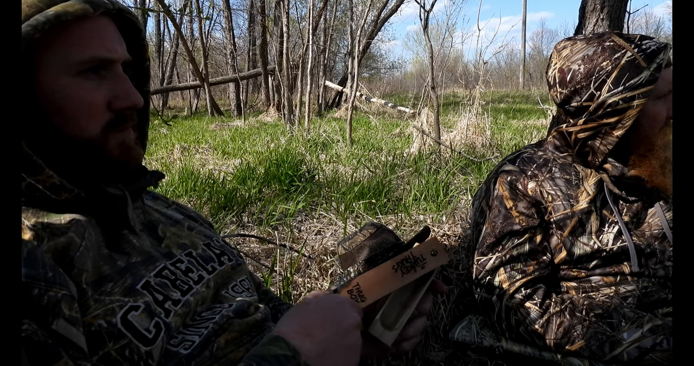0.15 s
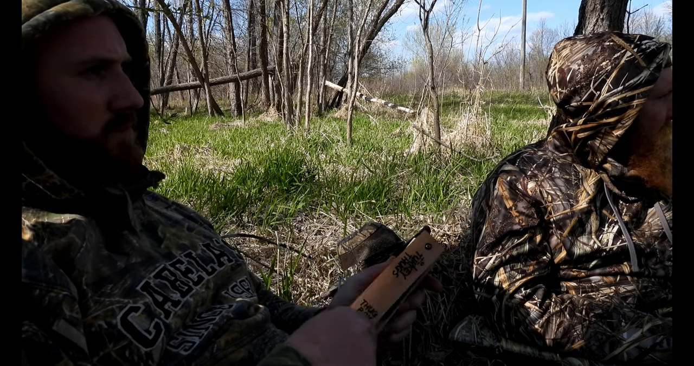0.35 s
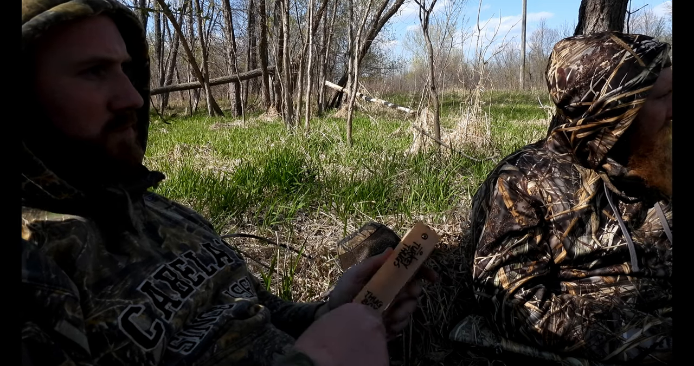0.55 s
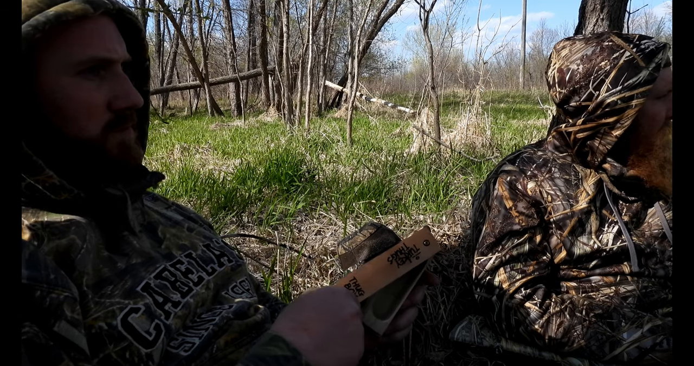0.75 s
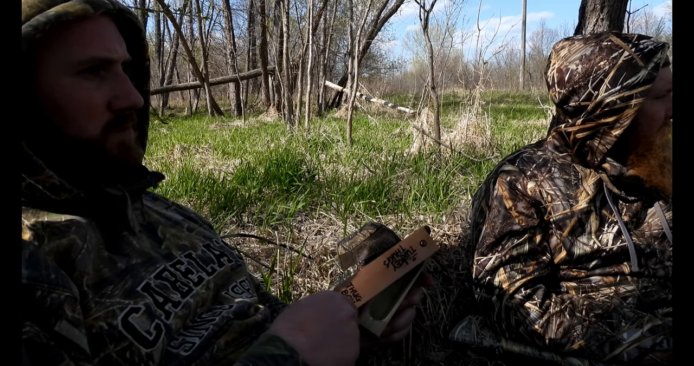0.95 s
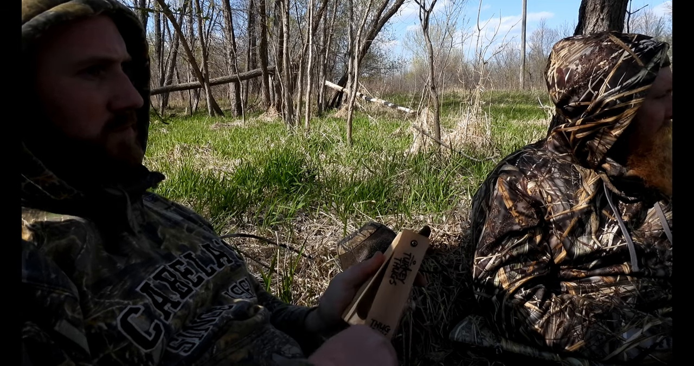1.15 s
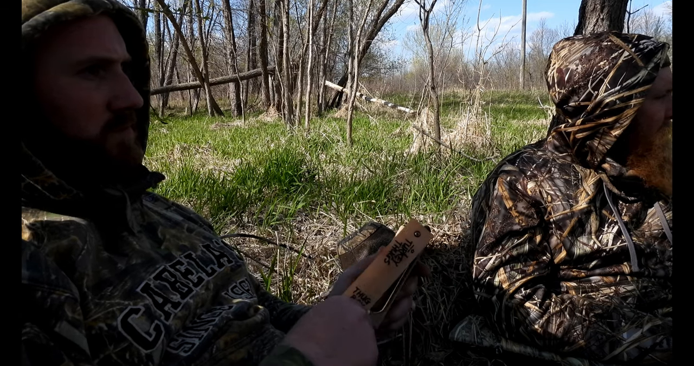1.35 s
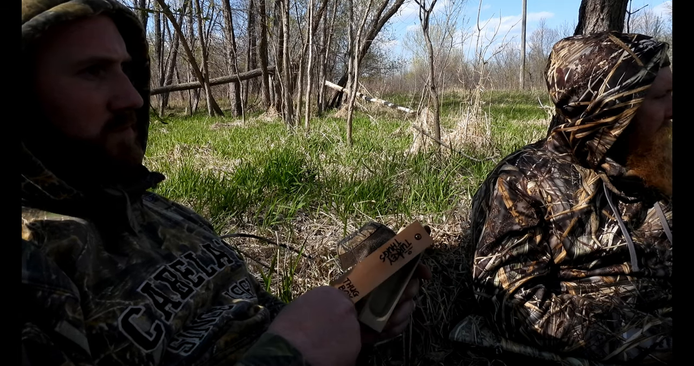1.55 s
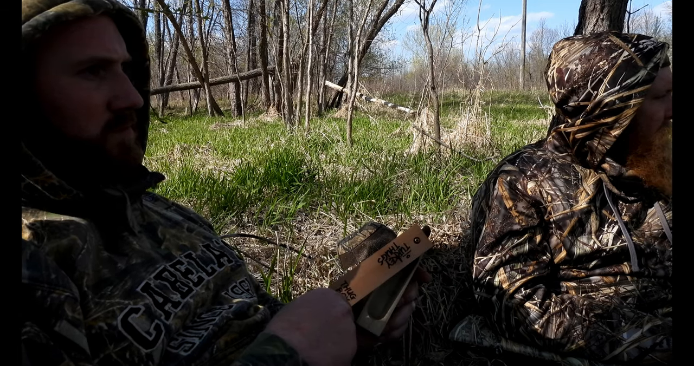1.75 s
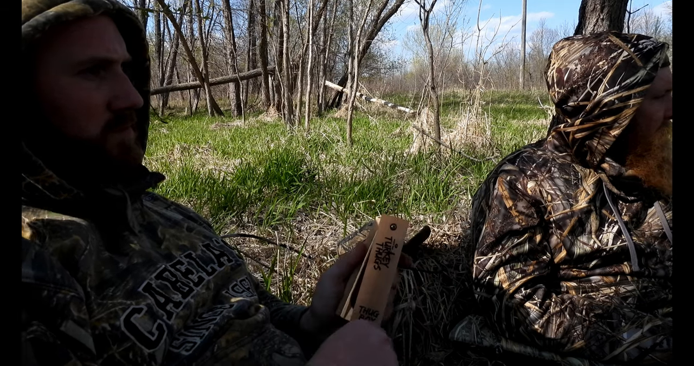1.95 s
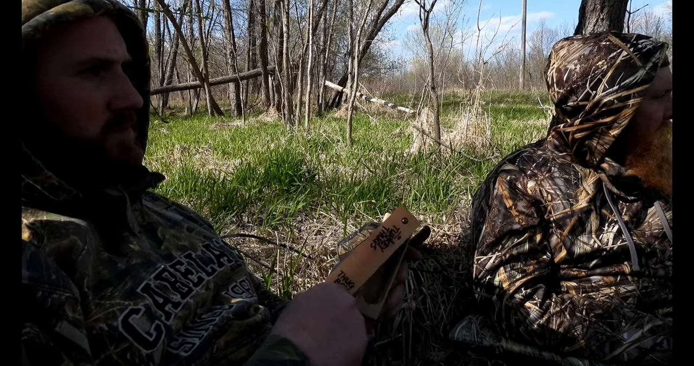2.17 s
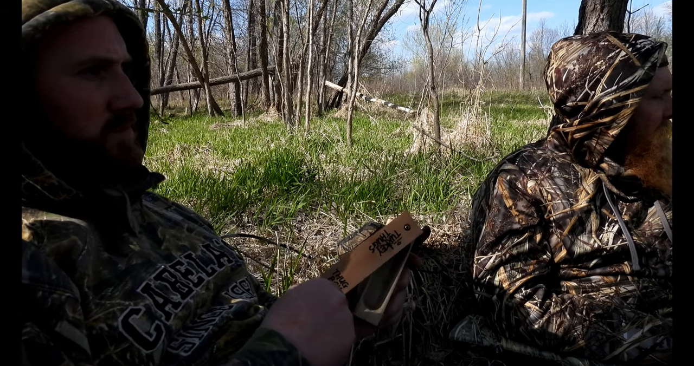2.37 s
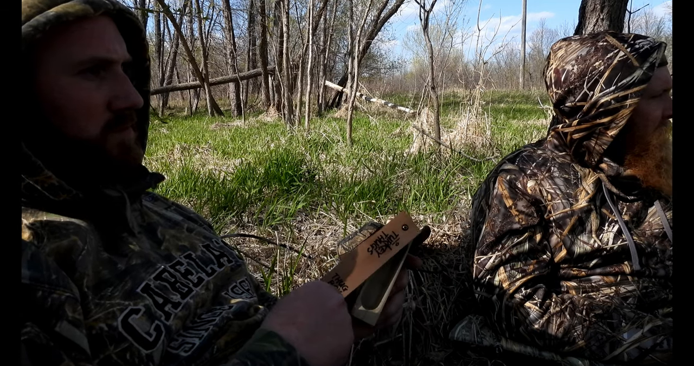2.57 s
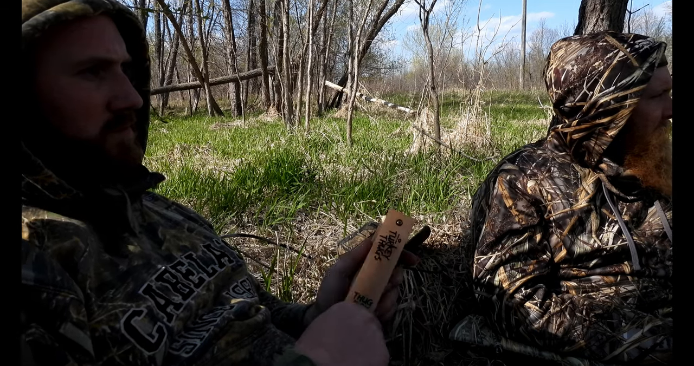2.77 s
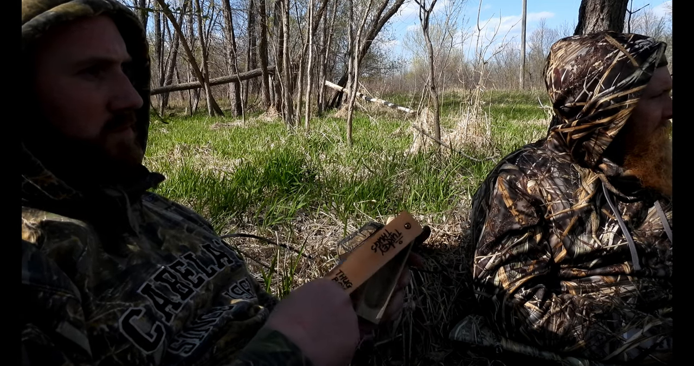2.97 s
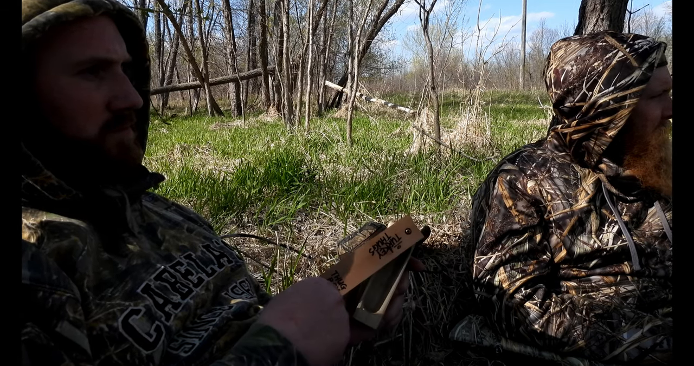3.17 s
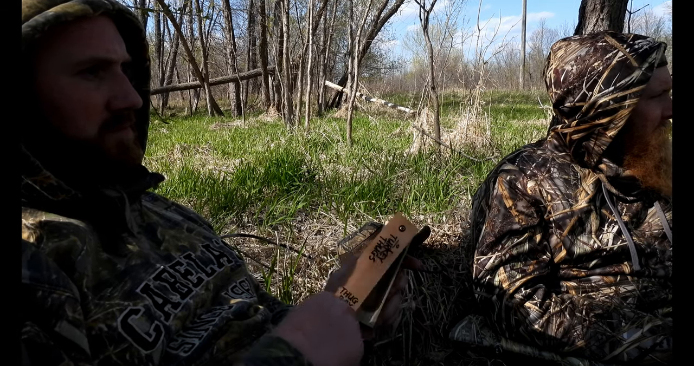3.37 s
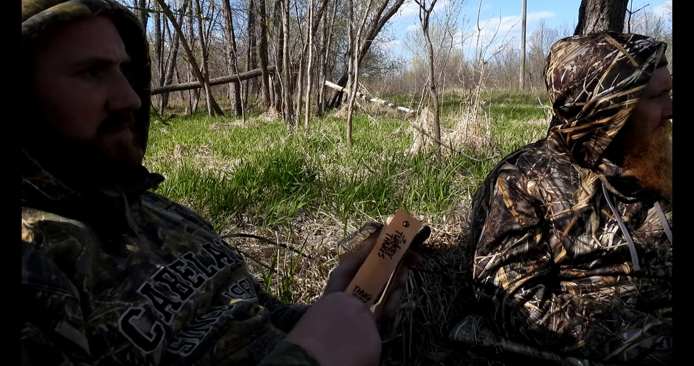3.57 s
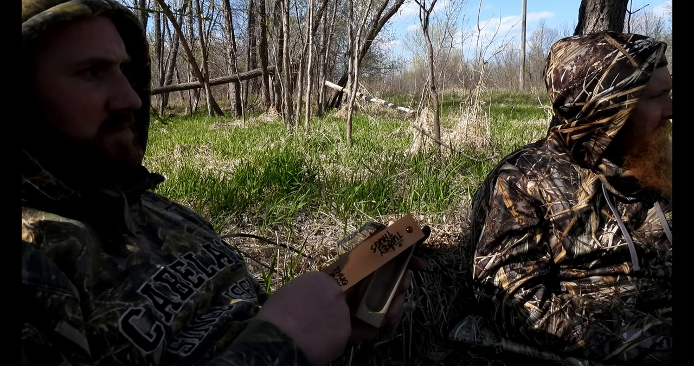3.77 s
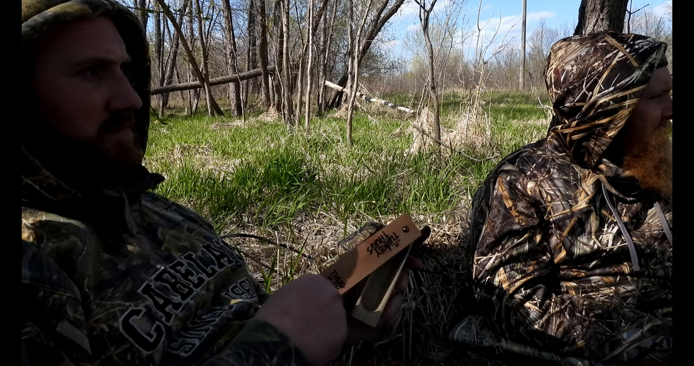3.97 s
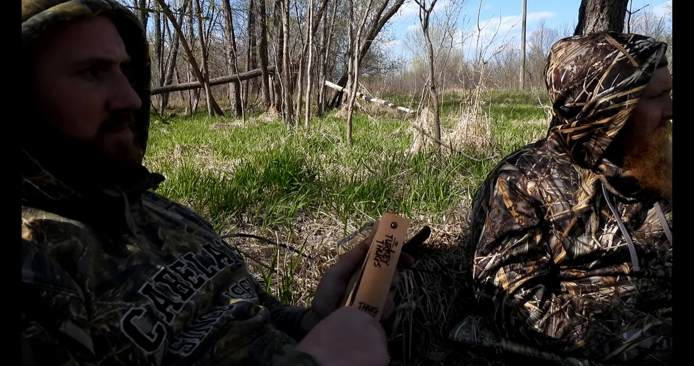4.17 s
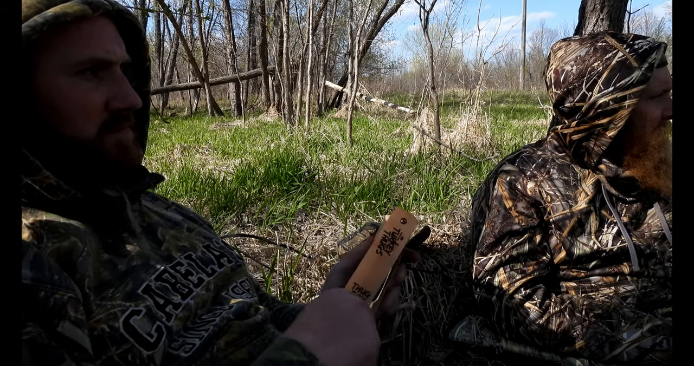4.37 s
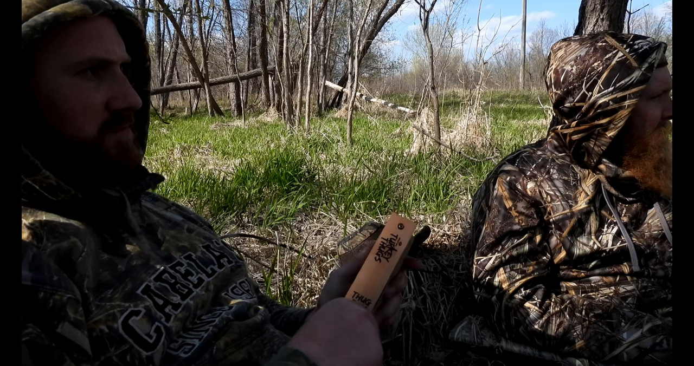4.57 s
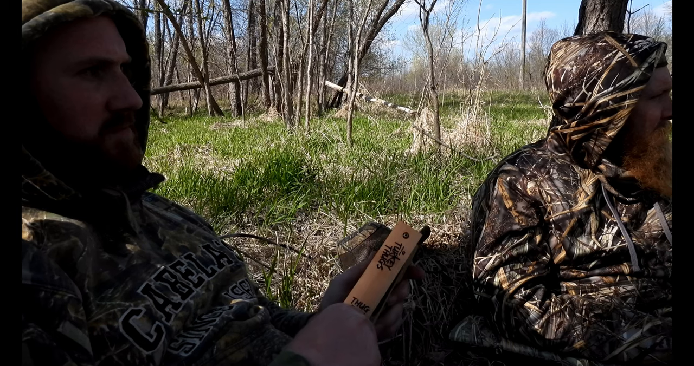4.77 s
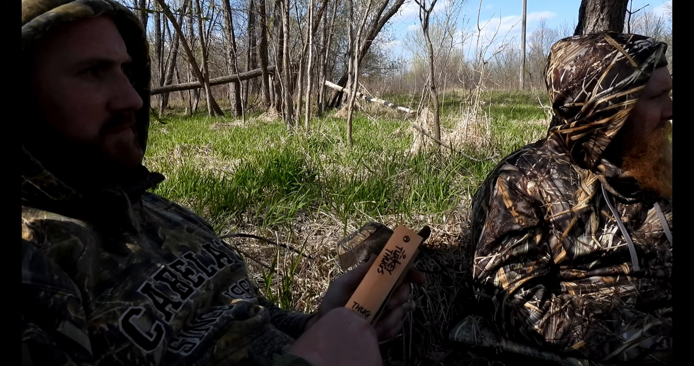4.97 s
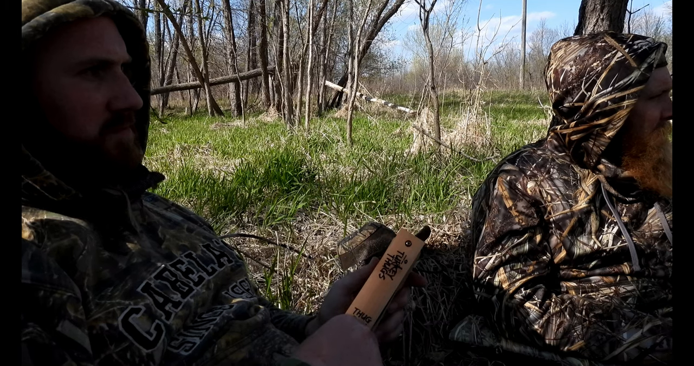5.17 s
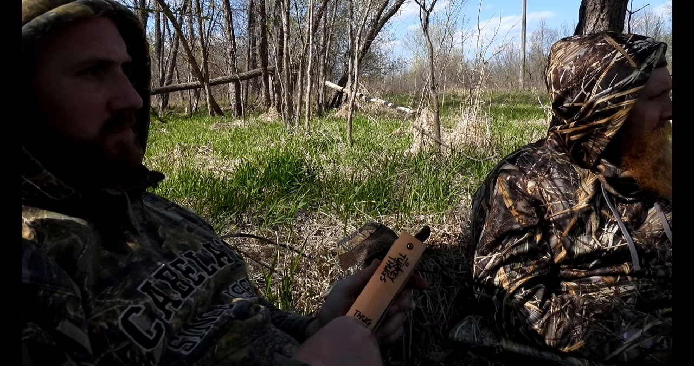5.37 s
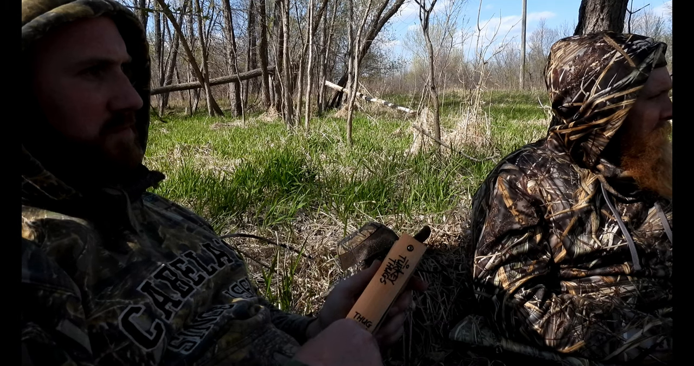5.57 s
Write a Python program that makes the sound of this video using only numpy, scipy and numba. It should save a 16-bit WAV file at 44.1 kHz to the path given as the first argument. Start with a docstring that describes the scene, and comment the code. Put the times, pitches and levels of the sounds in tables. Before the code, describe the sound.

A chalked wooden lid is stroked six times across a box, giving loud nasal hen-turkey yelps in quiet, faintly echoing open woods.

```python
"""Open woods, a wooden box call close to a small camera: six strokes of the chalked lid across the rim.
The lid sticks and slips about a thousand times a second; force pulses, grit and knocks ring box and lid modes.
Trees send back a faint echo, made of decaying noise. Behind lie far road noise and a low engine hum, both
filtered noise, and a faint bright hiss up to the first stroke. The camera's gain control ducks at peaks and
creeps back up."""
import sys
import numpy as np
from scipy import signal
from scipy.fft import rfft, irfft
from scipy.io import wavfile
from scipy.ndimage import uniform_filter1d
from numba import njit

SR = 44100
rng = np.random.default_rng(int(sys.argv[2]) if len(sys.argv) > 2 else 0)


def file_out(sig):
    """Save sig as 16-bit WAV at sys.argv[1]."""
    # one column per channel
    cols = np.atleast_2d(sig).T
    # limit, then scale
    lim = np.clip(cols, -1, 1)
    pcm = np.round(lim * 32767).astype(np.int16)
    wavfile.write(sys.argv[1], SR, pcm)


def amplitude_ratio(level_db):
    """Convert a level in decibels to the matching linear amplitude (field) ratio."""
    exponent = np.asarray(level_db, float) / 20
    return 10 ** exponent


N = 248028
TIME = np.arange(N) / SR

# strokes of the lid: (grips [s], fastest slipping [s], slowest slipping [s], lifts [s])
STROKE_TIMES = [(.470, .492, .537, .558), (1.235, 1.254, 1.281, 1.298), (2.014, 2.035, 2.063, 2.071),
                (2.764, 2.784, 2.812, 2.822), (3.521, 3.536, 3.556, 3.563), (4.252, 4.261, 4.278, 4.284)]


def unit(x):
    """Scale to an rms of one."""
    return x / np.sqrt(np.mean(x ** 2))


def resonance(x, hz, width_hz):
    """Two-pole band-pass, gain 1 at the centre."""
    return signal.lfilter(*signal.iirpeak(hz, hz / width_hz, fs=SR), x)


def distance():
    """Smooth far road noise, shaped in the spectrum, and a low wavering engine hum: narrow-band noise."""
    # far road noise: (frequency [Hz], relative spectral density [dB])
    road_spectrum = [(15, -46), (25, -25), (95, -7), (176, -21), (326, -16.5), (558, -13), (952, -5),
                     (1500, -12.5), (2200, -29.5), (3000, -42), (4500, -55.5), (15000, -58)]
    road_db = -49.5
    hum_hz, hum_width_hz, hum_db = 97, 22, -62
    hz, db = np.transpose(road_spectrum)
    bins_hz = np.fft.rfftfreq(N, 1 / SR) + 1  # +1 keeps the log finite
    tilt = amplitude_ratio(np.interp(np.log(bins_hz), np.log(hz), db))
    road = irfft(rfft(rng.standard_normal(N)) * tilt, N)
    hum = resonance(rng.standard_normal(N), hum_hz, hum_width_hz)
    return amplitude_ratio(road_db) * unit(road) + amplitude_ratio(hum_db) * unit(hum)


def opening_hiss():
    """Faint bright background hiss up to the first stroke: broadly filtered noise."""
    # hiss: (time [s], level [dB])
    hiss_level = [(0, -68.5), (.3, -68.5), (0.378, -63), (.46, -63.5), (0.481, -97)]
    centre_hz, width_hz = 5850, 8900
    s, db = np.transpose(hiss_level)
    hiss = resonance(rng.standard_normal(N), centre_hz, width_hz)
    return unit(hiss) * amplitude_ratio(np.interp(TIME, s, db)) * (TIME < s[-1])


def swell(s, db):
    """Gain along (s, dB) points, -200 dB outside them."""
    return amplitude_ratio(np.interp(TIME, s, db, left=-200, right=-200))


def grit():
    """Chalk grating: dense irregular micro-slips of different size, loudest as the lid bites."""
    # each stroke: (first touch [s], sliding [relative dB], at the bite [relative dB], rubbing [relative dB])
    grating = [(.33, -29, -17, -32), (1.19, -27, -15.5, -33), (1.97, -24, -17, -34.5),
               (2.71, -27, -12.5, -30.5), (3.46, -21, -18, -30.5), (4.20, -17, -13.5, -21)]
    # short scrapes at or after the end of a stroke: (time [s], length [s], level [relative dB])
    end_scrapes = [(0.573, .028, -21.5), (1.315, .035, -15.5), (4.283, 0.0066, -29.5)]
    touch_db, leave_db = -54.5, -24.5
    slide_in_s, bite_s, leave_s, gone_s = .026, .009, .005, .009
    scrape_rise_s, scrape_fall_s = .012, .023
    gain = np.zeros(N)
    for (touch, slide_db, bite_db, rub_db), (grip, fast, slow, lift) in zip(grating, STROKE_TIMES):
        s = [touch, grip - slide_in_s, grip, grip + bite_s,
             (fast + slow) / 2, slow, lift - leave_s, lift + gone_s]
        db = [touch_db, slide_db, slide_db, bite_db, rub_db, rub_db, leave_db, touch_db]
        gain += swell(s, db)
    for start, length, level_db in end_scrapes:
        end = start + length
        gain += swell([start - scrape_rise_s, start, end, end + scrape_fall_s],
                      [touch_db, level_db, level_db, touch_db])
    grain_size = amplitude_ratio(2.5 * rng.exponential(size=N))
    grains = rng.standard_normal(N) * grain_size * (rng.random(N) < .3)
    return 4 * unit(grains) * gain


def knocks():
    """Single catches and knocks on box and lid; a longer contact is a duller push."""
    # blows: (time [s], level [relative dB], nominal contact [ms], share to the lid rather than the box [0-1])
    blows = [(.458, -22.5, .2, 0.6), (.467, -17.5, .2, 0.2), (.473, -5, .15, 0.63), (0.574, 3, .3, 1),
             (1.104, -39, .3, 1), (1.227, -13.5, .3, 0.4), (1.31, 14.5, .35, 0.3), (2.001, -9.5, .3, 0.4),
             (2.612, -28, .3, 0.1), (2.694, -12, .35, 1), (3.353, -25.5, 0.36, 1), (3.513, -3.5, .2, 0),
             (3.518, -21, .2, 0.3), (4.045, -26.5, .25, .3), (4.128, -19.5, .1, 0.9),
             (4.242, -3, 0.26, 0.1), (4.244, 8, .3, 0.1), (4.252, 0, .2, 0), (5.339, -5, 0.63, 0.67)]
    force = np.zeros((2, N))  # rows: box, lid
    for s, db, contact_ms, lid_share in blows:
        push = np.hanning(int(contact_ms * SR / 1000) + 3)
        push = 30 * amplitude_ratio(db) * push / push.sum()
        force[:, int(s * SR):][:, :len(push)] += np.outer([1 - lid_share, lid_share], push)
    return force


def stroke_controls(grip, fast, slow, lift, bite_share, fast_db, slow_db, lock, lateness):
    """Slip rate, pressure, patterns and unevenness through one stroke."""
    # slip rate climbs, sags slowly, then faster, and flattens out at the bottom;
    # it rebounds, and catches high again if the lid stays on
    grip_hz, fast_hz, slow_hz, rebound_hz, recatch_hz = 1254, 1356.8, 972.6, 1073, 1292
    rebound_s, recatch_s, lift_s = .004, .009, .004
    # pressure builds in two steps (relative to the fastest), fades after the rebound, drops at the lift
    grip_db, bite_db, fade_db_per_s, lift_db = -27.5, -9, 450.5, -38
    # threes set in above a slip rate, twos on the rebound
    third_above_hz, third_spread_hz = 1285, 35
    third_recatch, second_rebound = .23, .9
    uneven_grip, uneven_bite, uneven_rub, uneven_end = .3, .16, .083, .57
    uneven_per_third = .12

    t = np.arange(grip, lift, 1 / SR)
    bite = grip + bite_share * (fast - grip)
    rebound, recatch = slow + rebound_s, slow + recatch_s
    climb = np.minimum((t - grip) / (fast - grip), 1)
    sag_progress = np.clip((t - fast) / (slow - fast), 0, 1) ** lateness
    sag = np.sin(np.pi / 2 * sag_progress) ** 2
    hz = grip_hz + (fast_hz - grip_hz) * np.sin(np.pi / 2 * climb) - (fast_hz - slow_hz) * sag
    hz = hz + np.interp(t, [slow, rebound, recatch], [0, rebound_hz - slow_hz, recatch_hz - slow_hz])

    db = np.interp(t, [grip, bite, fast, slow], [fast_db + grip_db, fast_db + bite_db, fast_db, slow_db])
    db = db - fade_db_per_s * np.maximum(t - rebound, 0)
    db = db + lift_db * np.clip(1 - (lift - t) / lift_s, 0, 1)

    locked = lock * climb * np.clip((hz - third_above_hz) / third_spread_hz, 0, 1)
    third = np.where(t < slow, locked, third_recatch * np.interp(t, [rebound, recatch], [0, 1]))
    second = second_rebound * np.interp(t, [slow, rebound, recatch], [0, 1, 0])
    uneven = np.interp(t, [grip, bite, fast, slow, recatch],
                       [uneven_grip, uneven_bite, uneven_rub, uneven_rub, uneven_end])
    return t, hz, db, third, second, uneven + uneven_per_third * third


def clicks(seconds, sizes):
    """Band-limited impulses placed between samples."""
    at = np.asarray(seconds)[:, None] * SR
    index = np.floor(at).astype(int) + np.arange(-7, 9)
    shape = np.sinc(index - at) * np.cos(np.pi * (index - at) / 16) ** 2
    return np.bincount(index.ravel(), (shape * np.asarray(sizes)[:, None]).ravel(), N)


def slips(*stroke):
    """One force pulse per slip; the lid can lock into patterns of three or two slips."""
    t, *controls = stroke_controls(*stroke)
    turns = np.cumsum(controls[0]) / SR
    k = np.arange(1, int(turns[-1]))
    at = np.interp(k, turns, t)
    hz, db, third, second, uneven = (np.interp(at, t, c) for c in controls)
    size_chance, time_chance = rng.standard_normal((2, len(k)))
    pattern = third * (3 * (k % 3 == 0) - 1) + second * (-1.) ** k
    size = (1 + uneven * size_chance) * amplitude_ratio(db) * SR / (2 * hz)
    at = at + .12 * uneven * time_chance / hz
    return np.array([clicks(at, size), clicks(at, size * pattern)])


def yelps():
    """Slip force; the strong-weak pattern couples to the middle wall modes, weakly above and below them."""
    # the hand in each stroke: (bites at share of the climb [0-1], pressure when fastest [relative dB],
    # when slowest [relative dB], lock on every third slip [factor], lateness of the sag [exponent])
    hand_moves = [(.4, 14, 15, 1.2, 1.4), (0.2, 12, 14.5, 1, 1.4), (0.4, 13, 16, 1.3, 1.3),
                  (1, 14, 16, 0.028, 1.5), (0.9, 16, 15, 0.36, 1.2), (0.3, 17.5, 16, 1.3, 1.2)]
    pattern_low_hz, pattern_top_hz = 1350, 3700
    even, pattern = sum(slips(*stroke, *hand) for stroke, hand in zip(STROKE_TIMES, hand_moves))
    band = signal.butter(2, [pattern_low_hz, pattern_top_hz], "band", fs=SR, output="sos")
    return even + signal.sosfiltfilt(band, pattern)


def wood(force, modes):
    """Thin wood rings in its modes, neighbours out of phase, and radiates little below the lowest."""
    low_hz = 776
    ring = np.zeros(N)
    for k, (hz, width_hz, db) in enumerate(modes):
        ring += (-1) ** k * amplitude_ratio(db) * resonance(force, hz, width_hz)
    return signal.sosfilt(signal.butter(8, low_hz, "high", fs=SR, output="sos"), ring)


def box(force):
    """Force on the box rings its resonances."""
    # box modes: (frequency [Hz], width [Hz], gain [dB])
    box_modes = [(1073, 450, -9.5), (1210.4, 38, -1), (1270, 190, -5.5), (1594, 219, 0), (1756.4, 230, -5),
                 (1893, 304, -2), (2413.6, 160, -4), (2550, 160, -7), (2929, 240, -11.5), (3234, 690, -21),
                 (4230, 140, -19), (4210, 330, -27.5), (4930, 300, -18.5), (5300, 200, -16.5),
                 (5876, 140, -16.5), (6630, 640, -31.5), (7920, 130, -37), (10100, 11000, -54),
                 (13000, 8000, -51.5)]
    return wood(force, box_modes)


def lid(force):
    """Force on the loose lid rings its resonances."""
    # lid modes: (frequency [Hz], width [Hz], gain [dB])
    lid_modes = [(1120, 59, -6), (1430, 51, -6), (1700, 75, 3), (1720, 56, -2.5), (2310, 230, -22.5),
                 (3860, 400, -36), (6400, 1500, -31.5), (10300, 4500, -38.5)]
    return wood(force, lid_modes)


def woods(x):
    """Scattered returns from trunks and branches, a few clumps stronger, treble lost on the way."""
    # echoes from trunks, over a diffuse tail: (delay [s], level [relative dB])
    trunks = [(0.048, -52), (0.098, -48.5)]
    tail_db, t60_s, rise_s, clump_s, dull_hz = -54, .9, .027, .0034, 4000  # tail_db relative
    t = TIME[:SR]
    shape = amplitude_ratio(tail_db - 60 * t / t60_s) * np.minimum(t / rise_s, 1)
    for delay_s, db in trunks:
        shape = shape + amplitude_ratio(db) * np.exp(-((t - delay_s) / clump_s) ** 2)
    reply = rng.standard_normal(len(t)) * shape / 20
    reply = signal.sosfilt(signal.butter(2, dull_hz, fs=SR, output="sos"), reply)
    return signal.fftconvolve(x, reply)[:N]


def scene():
    """The call, its echo, the opening hiss and the far background."""
    grit_into_box = .45
    background = distance() + opening_hiss()
    scrape = grit()
    on_box, on_lid = knocks()
    call = box(yelps() + grit_into_box * scrape + on_box) + lid(scrape + on_lid)
    return (call + woods(call) + background)[None]


@njit
def peak_follower(x, limit, attack, recovery):
    """Rises fast on peaks over the limit, sinks back slowly."""
    y, peak = np.empty(len(x)), limit
    for i in range(len(x)):
        if abs(x[i]) > peak:
            peak += attack * (abs(x[i]) - peak)
        else:
            peak = max(limit, peak * recovery)
        y[i] = peak
    return y


def top_cut(x):
    """Nothing passes above the cut-off."""
    return signal.sosfilt(signal.butter(12, 15900, fs=SR, output="sos"), x)


def record(dry):
    """Gain control that looks a little ahead, clipping of what overshoots, top cut."""
    limit_db, recovery_db_per_s = -1, 8.5
    attack_s, look_ahead_s, top_hz = .001, .004, 15900
    peak = peak_follower(dry[0], amplitude_ratio(limit_db), 1 / (attack_s * SR), amplitude_ratio(-recovery_db_per_s / SR))
    ahead = int(look_ahead_s * SR)
    peak_ahead = np.append(peak[ahead:], peak[-ahead:])
    gain = uniform_filter1d(amplitude_ratio(limit_db) / peak_ahead, ahead)
    clipped = np.clip(dry[0] * gain, -1, 1)
    mix = signal.sosfilt(signal.ellip(8, .2, 70, top_hz, fs=SR, output="sos"), clipped)
    return top_cut(mix[None])


dry = scene()
out = record(dry)
file_out(out)
```